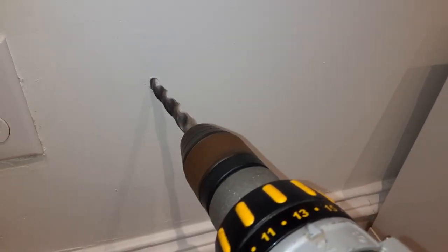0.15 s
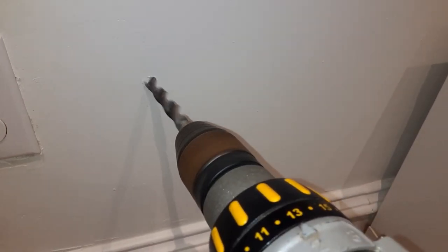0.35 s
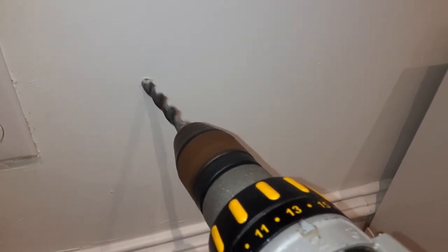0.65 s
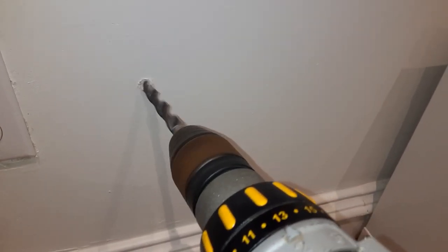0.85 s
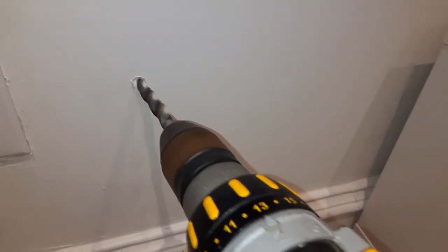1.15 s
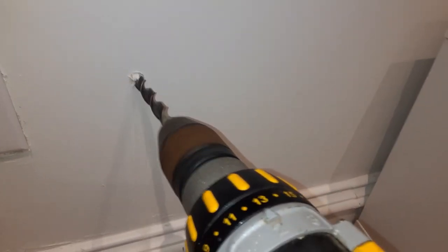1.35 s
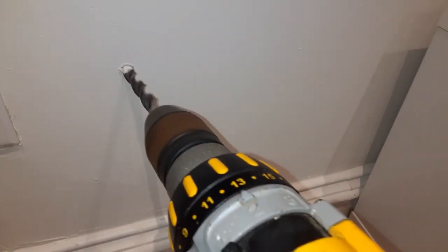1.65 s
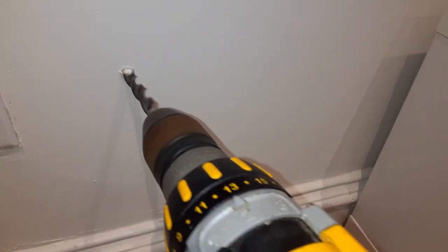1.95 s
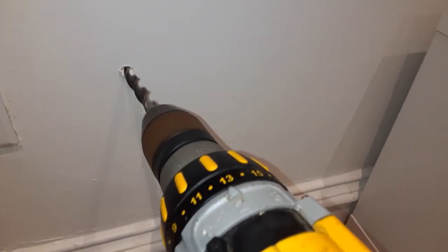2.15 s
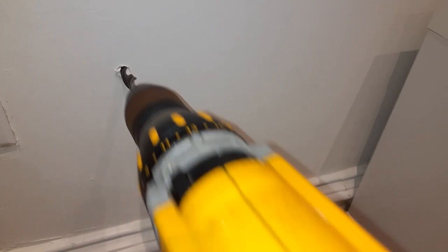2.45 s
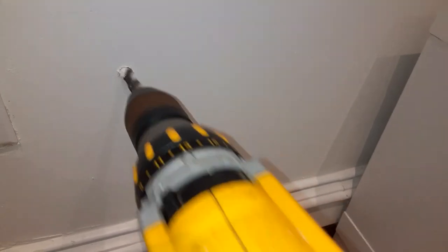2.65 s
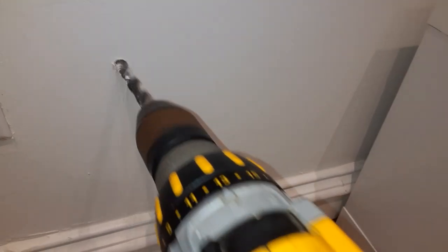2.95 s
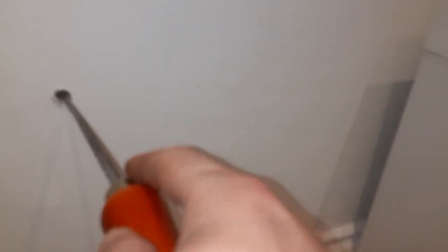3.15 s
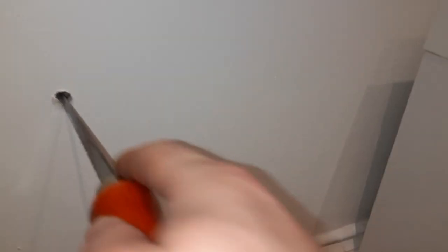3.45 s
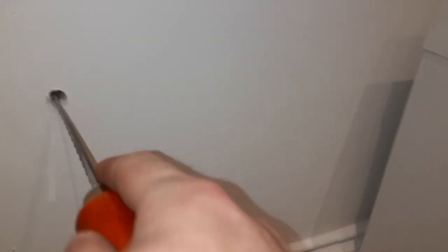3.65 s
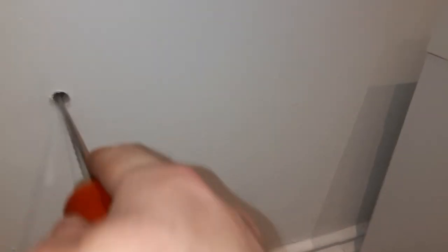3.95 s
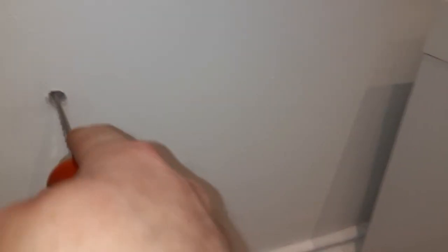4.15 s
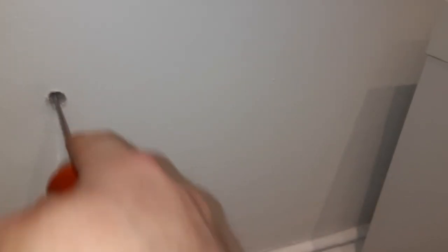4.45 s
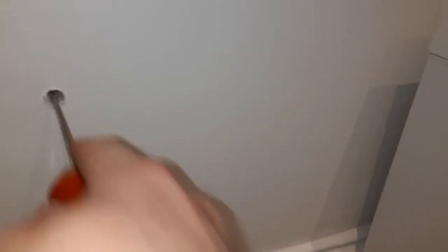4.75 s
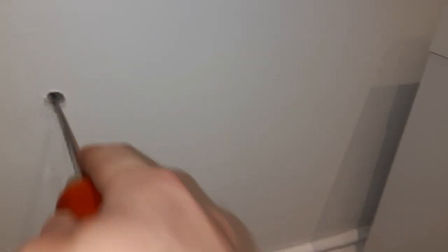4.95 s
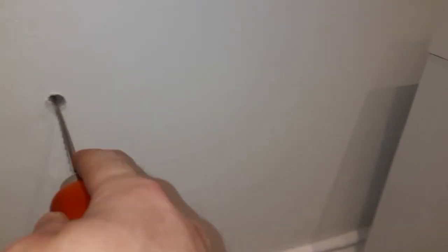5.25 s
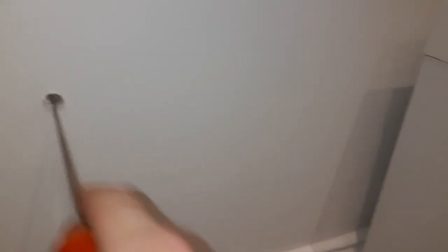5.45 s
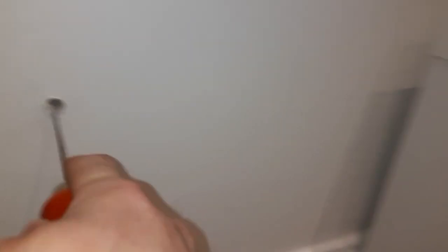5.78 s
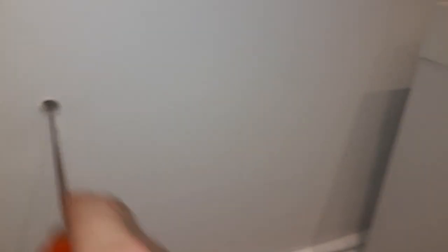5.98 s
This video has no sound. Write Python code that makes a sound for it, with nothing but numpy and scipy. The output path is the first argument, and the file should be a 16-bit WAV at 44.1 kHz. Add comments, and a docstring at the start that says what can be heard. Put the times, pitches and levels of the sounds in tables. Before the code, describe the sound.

Close in a small room, a drill bores into a hollow wall, followed by fast back-and-forth hand sawing.

```python
"""A small room, close to a drywall sheet. A cordless drill spins up and bores through: the motor whines,
gears ring and rattle the housing, brushes hiss, the bit squeaks and its flutes grind gypsum.
The sound cuts off. A jab saw knocks into the hole and is worked to and fro, seven strokes a second:
its teeth drum on the hollow wall, crack the board and scrape out gypsum."""
import sys
import numpy as np
from scipy import signal
from scipy.fft import rfft, irfft
from scipy.io import wavfile

SR = 44100
rng = np.random.default_rng(int(sys.argv[2]) if len(sys.argv) > 2 else 0)


def to_wav(s):
    """Save 16-bit WAV."""
    ch = np.atleast_2d(s).T  # columns
    pcm = np.round(np.clip(ch, -1, 1) * 32767)  # PCM
    wavfile.write(sys.argv[1], SR, pcm.astype(np.int16))


N = 269892
TIME = np.arange(N) / SR
CUT_S, RESUME_S = 3.156, 3.19  # gap between drill and saw


def undb(db):
    """Decibels to gain."""
    return 10 ** (np.asarray(db) / 20)


def unit(x):
    """Scale to rms 1."""
    return x / np.sqrt(np.mean(x ** 2) + 1e-18)


def walk(rate_hz):
    """Smooth random drift, spread near 1."""
    knots = rng.standard_normal(4096)
    return 1.045 * np.interp(TIME * rate_hz, np.arange(len(knots)), knots)


def ramp(centre_s, length_s):
    """Linear step from 0 to 1."""
    return np.clip((TIME - centre_s) / length_s + .5, 0, 1)


def swells(table):
    """Summed gain of bell-shaped swells."""
    return sum(undb(db) * np.exp(-(2 * (TIME - s) / length_s) ** 2) for s, length_s, db in table)


def between(first, second, share):
    """Linear blend, share 0-1."""
    return first + (second - first) * share


def convolve(x, response):
    """Apply an impulse response."""
    return signal.oaconvolve(x, response)[:N]


def body(points=(), modes=(), size=8192):
    """Minimum-phase impulse response of a broad spectrum plus resonances."""
    f = np.arange(size // 2 + 1) * SR / size + 1
    power = np.zeros(len(f)) + 1e-12
    if len(points):
        hz, db = np.transpose(points)
        power += undb(np.interp(np.log(f), np.log(hz), db)) ** 2 / (1 + (hz[0] / f) ** 4)
    for hz, width_hz, db in modes:
        power += undb(db) ** 2 / (1 + ((f - hz * hz / f) / width_hz) ** 2 / 2) ** 2
    cepstrum = irfft(np.log(power) / 2)
    cepstrum[1:size // 2] *= 2
    cepstrum[size // 2 + 1:] = 0
    return irfft(np.exp(rfft(cepstrum)))


def grit(spread_db):
    """Dense tiny impacts of unequal size."""
    return unit(rng.standard_normal(N) * undb(spread_db * rng.standard_normal(N)))


def place(x, lag_ms, pan_db, room_db, t60_s=0.19):
    """Stereo position: left lags by lag_ms and is pan_db louder; each side has its own room echoes."""
    t = TIME[:SR // 4]
    taps = np.arange(-40, 41)
    late = np.convolve(x, np.sinc(taps - lag_ms * SR / 1000), "same")
    out = []
    for direct, db in ((late, pan_db / 2), (x, -pan_db / 2)):
        echoes = rng.standard_normal(len(t)) * np.exp(-np.log(1000) * t / t60_s) * (t > .002)
        out.append(undb(db) * unit(unit(direct) + undb(room_db) * unit(convolve(x, echoes))))
    return np.array(out) * np.std(x)


# room air spectrum: freq_hz, level_db
AIR_SPECTRUM = [(18, -65), (30, -26), (53, -6.5), (129, 1.5), (211, -3), (247, -12), (364, -7.5),
                (437, -14.5), (735, -13.5), (15000, -46.5)]

def room_tone():
    """Soft air, absent for a moment after the drill cuts off."""
    air = unit(convolve(rng.standard_normal(N), body(AIR_SPECTRUM))) * undb(-45.5 + walk(5.43))
    gate = (TIME < CUT_S + .008) | (TIME > RESUME_S)
    return place(air, lag_ms=0, pan_db=-2.5, room_db=-3.5) * gate


# hollow wall resonances: freq_hz, width_hz, level_db
WALL_MODES = [(67.7, 11, 1.5), (81.7, 18.7, 2), (110, 11, -2.5), (150.8, 26.6, -3.5), (262.6, 44, -17.5)]
# drill jolts on the wall: centre_s, length_s, level_db
WALL_JOLTS = [(.64, 0.11, -36.5), (2.39, 0.062, -31.5), (2.82, 0.28, -37), (3.08, 0.036, -43)]

def wall_rumble(speed_oct, given):
    """The drill shakes the hollow wall, more with speed and once the board has given."""
    level_db = between(-50.5, -42, given) + 21 * speed_oct + 5 * walk(10.54)
    shaking = undb(level_db) + swells(WALL_JOLTS)
    return unit(convolve(grit(spread_db=3.5), body(modes=WALL_MODES))) * shaking


# rubbing of the bit: start_s, end_s, pitch_hz, width_hz, level_db
BIT_RUBS = [(-.05, .31, 4840, 70, -30), (2.62, 2.98, 2980, 110, -32), (2.55, 2.9, 4200, 70, -37)]

def bit_rubs(fade_s=0.04):
    """Steel sliding on paint and board rings in narrow, restless bands."""
    out = np.zeros(N)
    for start_s, end_s, hz, width_hz, db in BIT_RUBS:
        ring = unit(convolve(rng.standard_normal(N), body(modes=[(hz, width_hz, db)])))
        gate = np.clip(np.minimum(TIME - start_s, end_s - TIME) / fade_s, 0, 1)
        out += ring * undb(db + 2 * walk(30)) * gate
    return out


# squeaks of the bit: centre_s, length_s, pitch_hz, level_db
BIT_SQUEAKS = [(0.029, 0.029, 4550, -11), (0.102, 0.021, 4490, -12.5), (0.18, 0.011, 4620, -13),
               (0.256, .018, 4450, -10), (0.309, 0.017, 4260, -9), (3.094, 0.017, 4430, -9)]

def bit_squeaks(bend=0.023, roughness=0.024):
    """The bit sticks and slips; each squeak sags in pitch as it grips."""
    out, flutter = np.zeros(N), walk(900)
    for centre_s, length_s, hz, db in BIT_SQUEAKS:
        offset = np.clip((TIME - centre_s) / length_s, -2, 2)
        pitch_hz = hz * (1 + bend * np.abs(offset) + roughness * flutter)
        tone = np.sqrt(2) * np.sin(2 * np.pi * np.cumsum(pitch_hz) / SR)
        out += undb(db) * np.exp(-4 * offset ** 2) * tone
    return place(out, lag_ms=0.086, pan_db=0.5, room_db=-20)


# flute resonances: freq_hz, width_hz, level_db; then the grind level at full depth
FLUTE_MODES, GRIND_DB = [(5040, 210, 1), (5770, 150, 2.5), (9840, 1100, -8)], -27.5

def flute_grind(chatter, depth, plunged):
    """The flutes grind gypsum, louder with depth, silent while plunged through."""
    grains = unit(convolve(grit(spread_db=7.5) * chatter, body(modes=FLUTE_MODES)))
    return grains * undb(GRIND_DB) * depth * (1 - plunged)


# gearbox and housing spectrum: freq_hz, level_db
HOUSING_SPECTRUM = [(250, -22.5), (500, -21.5), (850, -2.5), (1150, -9.5), (1500, -6.5), (1900, -21.5),
                    (3100, -4), (4500, -10), (5700, -6.5), (6700, -12), (9000, -21), (15000, -56)]
# housing resonances: freq_hz, width_hz, level_db
HOUSING_RESONANCES = [(2162, 174, -5.5), (2727, 100, -1), (3830, 660, -2.5), (5075, 400, -4)]
# brush hiss spectrum: freq_hz, level_db
BRUSH_SPECTRUM = [(5500, -9), (6800, -13.5), (7700, 5.5), (8700, -3.5), (9900, -6), (11500, -6),
                  (12900, -5), (13800, -2.5), (15500, -11)]

def rattle_and_brushes(chatter, rattle_db, brush_db):
    """Housing rattle and brush hiss, each two independent noise layers for a smooth, wide sound."""
    housing, brush = body(HOUSING_SPECTRUM, HOUSING_RESONANCES), body(BRUSH_SPECTRUM)
    out = np.zeros((2, N))
    for lag_ms in (.2, .42):
        rattle = unit(convolve(grit(spread_db=5) * chatter, housing))
        hiss = unit(convolve(grit(spread_db=1.5) * chatter, brush))
        out += place(rattle * undb(rattle_db), lag_ms, pan_db=-3.5, room_db=-4.5, t60_s=0.042)
        out += place(hiss * undb(brush_db), lag_ms, pan_db=-1.5, room_db=4.5, t60_s=0.033)
    return out


# motor and gear lines: whine_ratio, relative_db
GEAR_PARTIALS = [(.4, -29), (.625, -36.5), (.8, -20.5), (1.25, -19), (1.4, -41), (1.557, -19.5), (1.8, -26),
                 (2, -26.5), (2.25, -16), (2.34, -23), (2.52, -20), (3, -13), (3.56, -17), (3.94, -14.5),
                 (4, -28), (4.69, -12.5), (4.9, -13), (5, -12), (6, -21), (6.75, -15), (6.94, -16),
                 (9, -16)]

def gear_lines(phase):
    """Tones locked to the motor; play in the gears makes each waver."""
    return sum(np.sqrt(2) * undb(db + 2.6 * walk(16)) * np.sin(ratio * phase + 0.17 * ratio * walk(45))
               for ratio, db in GEAR_PARTIALS)


def gear_mesh(phase, depth):
    """Meshing teeth sing at 4.5 times the whine, fading as the hole deepens."""
    level_db = -26.5 - 13.5 * depth ** 2 + 4 * walk(75)
    return np.sqrt(2) * undb(level_db) * np.sin(4.5 * phase + .55 * walk(150))


def gear_growl(phase, speed_oct, bitten, cutting):
    """Rough gear tone: grows with speed, harder before the bite, softer while cutting."""
    level_db = between(-39.5, -45, cutting) + 10.5 * (1 - bitten) + 10.5 * speed_oct + 3 * walk(60)
    return np.sqrt(2) * undb(level_db) * np.sin(2.06 * phase + .8 * walk(130))


def shaft_hum(shaft_phase, cutting):
    """One cycle a turn, louder while cutting."""
    return np.sqrt(2) * undb(between(-47, -42, cutting) + 3 * walk(22)) * np.sin(shaft_phase)


# housing radiation: whine_hz, level_db
WHINE_RADIATION = [(500, -46), (650, -40), (705, -27.5), (775, -19), (840, -20), (910, -23)]

def motor_whine(phase, whine_hz):
    """Motor tone; the housing radiates it best near full speed."""
    level_db = np.interp(whine_hz, *np.transpose(WHINE_RADIATION))
    return np.sqrt(2) * np.sin(phase) * undb(level_db + .5 * walk(40.27) + .5 * walk(6.26))


def hole_progress(bite_s=0.32, give_s=2.2, plunge_s=2.48, back_s=2.97):
    """Stages, each 0-1: bit has bitten, hole depth, board has given, drill is plunged in."""
    depth = np.clip((TIME - bite_s) / (give_s - bite_s), 0, 1)
    plunged = ramp(plunge_s, 0.33) - ramp(back_s, 0.33)
    return ramp(bite_s, 0.033), depth, ramp(give_s, 0.2), plunged


# motor speed: time_s, whine_hz
MOTOR_SPEED = [(0.0, 513.4), (0.1, 571.2), (0.12, 602.9), (0.16, 625.3), (0.21, 672.0), (0.23, 674.8),
               (0.37, 820.2), (0.4, 856.2), (0.5, 892.9), (0.7, 909.9), (1.2, 860.0), (2.0, 842.1),
               (3.04, 834.9), (3.15, 874.1)]

def drill(full_speed_hz=843):
    """Motor speed and hole progress drive the drill's layers until the sound cuts off."""
    whine_hz = np.interp(TIME, *np.transpose(MOTOR_SPEED))
    speed_oct = np.log2(whine_hz / full_speed_hz)
    bitten, depth, given, plunged = hole_progress()
    cutting = bitten - given
    # slightly duller as the drill moves forward, off the microphone's axis
    rattle_db = -23.5 + 3.5 * speed_oct - 0.8 * plunged
    brush_db = -31 + 7 * speed_oct - 0.5 * plunged
    phase = 2 * np.pi * np.cumsum(whine_hz * (1 + 0.0017 * walk(34.65))) / SR
    shaft_phase = phase / 5
    turn_pulse = 1 + .25 * np.sin(shaft_phase) + .25 * np.sin(2 * shaft_phase)
    whine = motor_whine(phase, whine_hz)
    gears = gear_lines(phase) * undb(rattle_db - 2.5 - 2 * depth)
    gears += gear_mesh(phase, depth) * turn_pulse
    gears += gear_growl(phase, speed_oct, bitten, cutting)
    hum = shaft_hum(shaft_phase, cutting)
    chatter = turn_pulse * undb(.5 * walk(170) + .5 * walk(14))
    rumble = wall_rumble(speed_oct, given)
    grind = flute_grind(chatter, depth, plunged)
    out = place(whine, lag_ms=.1, pan_db=.3, room_db=-26)
    out += rattle_and_brushes(chatter, rattle_db, brush_db)
    out += place(gears + bit_rubs(), lag_ms=0.2, pan_db=-4.5, room_db=-7)
    out += place(grind, lag_ms=0.222, pan_db=7.5, room_db=8, t60_s=0.09)
    out += place(rumble + hum, lag_ms=0, pan_db=-4, room_db=-45)
    cutoff = np.interp(TIME - CUT_S, [-.001, 0, .01], [1, .07, 0])
    return (out + bit_squeaks()) * cutoff


# gypsum on the blade: freq_hz, level_db
GYPSUM_SPECTRUM = [(500, -11.5), (1000, 15.5), (1600, -1.5), (3200, -1), (4800, 4.5), (7500, 0.5),
                   (10300, -6), (12000, -2), (15500, -0.5)]
# blade resonances: freq_hz, width_hz, level_db
BLADE_RESONANCES = [(1540, 230, 10), (2113, 230, 11), (2755, 100, 9.5), (4420, 480, 9.5), (8860, 450, 2),
                    (11900, 340, 0.5), (14000, 510, -14)]
# crunching board: freq_hz, level_db
CRUNCH_SPECTRUM = [(600, 6.5), (1150, -5.5), (1600, -9.5), (2300, -21.5), (3500, -11), (8000, -31)]
# blade knocks in the hole: start_s, tick_relative_db, thud_relative_db
BLADE_KNOCKS = [(3.199, -38, -46), (3.23, -41.5, -30.5), (3.544, -32, -22), (3.573, -35, -18),
                (3.592, -29, -23.5), (3.631, -26, -17), (3.719, -26, -24.5), (3.809, -40, -22),
                (3.869, -25, -15), (4.015, -26, -39), (4.337, -27.5, -49), (5.287, -27, -27),
                (5.391, -32, -36)]

def blade_knocks(tick_decay_s=0.0015, catch_delay_s=.018, catch_db=-39):
    """The blade hits the hole's edge with a crunch and a wall thud; teeth tick as each stroke starts."""
    ticks, thuds = np.zeros((2, N))
    t = TIME[:SR // 20]
    catches = [(s + catch_delay_s, catch_db + 5 * rng.standard_normal()) for s, *_ in SAW_STROKES]
    for start_s, tick_db, *_ in catches + list(BLADE_KNOCKS):
        i = int(start_s * SR)
        tick = undb(tick_db) * rng.standard_normal(len(t)) * np.exp(-t / tick_decay_s)
        ticks[i:i + len(t)] += tick[:N - i]
    for start_s, _, thud_db in BLADE_KNOCKS:
        thuds[int(start_s * SR)] += undb(thud_db)
    wall, board = body(modes=WALL_MODES), body(CRUNCH_SPECTRUM)
    blade = body(GYPSUM_SPECTRUM, BLADE_RESONANCES)
    crunch = convolve(ticks, blade / np.linalg.norm(blade) + undb(0.5) * board / np.linalg.norm(board))
    thud = convolve(thuds, wall / np.abs(wall).max())
    out = place(crunch * undb(4), lag_ms=-0.098, pan_db=1, room_db=-5.5)
    return out + place(thud * undb(2), lag_ms=-.1, pan_db=-4.5, room_db=-6)


def saw_stroke(start_s, end_s, tooth_hz, fastest_share=.53):
    """One pass: blade speed (0-1) and a pulse per catching tooth, uneven in time and force."""
    fastest_s = between(start_s, end_s, fastest_share)
    speed = np.sin(np.pi * np.interp(TIME, [start_s, fastest_s, end_s], [0, .5, 1]))
    teeth, tooth_s = np.zeros(N), start_s
    for jitter, size in rng.standard_normal((64, 2)):
        i = int(tooth_s * SR)
        if tooth_s >= end_s or i >= N:
            break
        teeth[i] = undb(1.9 * size)
        tooth_s += np.exp(.08 * jitter) / (tooth_hz * between(.6, 1.06, speed[i]))
    return np.abs(speed), teeth


# tooth bite through the board: freq_hz, level_db
BOARD_SPECTRUM = [(120, -20), (230, 9.5), (420, 8.5), (700, -5.5), (900, -13.5), (1500, -28), (2200, -62.5),
                  (4000, -50)]
# board resonances: freq_hz, width_hz, level_db
BOARD_RESONANCES = [(275, 18, -5), (378, 30, 10.5), (460, 26, -5), (639, 40, 6.5)]
# blade tip scraping in: centre_s, length_s, level_db
TIP_SCRAPES = [(3.48, .14, -59), (3.575, 0.062, -43), (3.65, .1, -59), (3.735, 0.09, -44.5)]
# push and pull in turn, each until the next: start_s, nominal_tooth_hz, force_db
SAW_STROKES = [(3.78, 98.8, -1), (3.945, 87.6, -6), (4.067, 96.4, .5), (4.212, 113.8, -0.5),
               (4.357, 110.8, -1), (4.504, 117.4, -1), (4.648, 112.5, -2), (4.791, 120.3, -2),
               (4.94, 112.5, 0), (5.092, 111.4, -2.5), (5.224, 117.4, 0), (5.369, 118.6, 2),
               (5.512, 118.7, .5), (5.652, 113.2, 0.5), (5.768, 127.4, 2), (5.9, 114, 0.5),
               (6.028, 111.1, 3.5)]
# a push rasps more, a pull bites more: bite_db, bite_db_per_db, rasp_db, rasp_db_per_db, grab_gain
PUSH, PULL = (-30, 1, -37.5, 0.95, 1.26), (-26, 2.5, -42.5, 0.2, 0.36)

def jab_saw(stop_s=6.17, boom_db=-16, dust_db=-66.5, puff_decay_s=0.0026):
    """Teeth drum on the wall and crack the board, hardest mid stroke; gypsum hisses on both faces."""
    wall, board = body(modes=WALL_MODES), body(BOARD_SPECTRUM, BOARD_RESONANCES)
    blade = body(GYPSUM_SPECTRUM, BLADE_RESONANCES)
    crumbling = undb(3.57 * walk(130))
    hiss = np.array([unit(convolve(grit(spread_db=1) * crumbling, blade)) for _ in range(2)])
    chips = convolve(rng.standard_normal(N), body(CRUNCH_SPECTRUM))
    tip_scrape = swells(TIP_SCRAPES)
    boom = np.zeros(N)
    bite = unit(chips) * crumbling * tip_scrape
    rasp = hiss * (tip_scrape + undb(dust_db)) * (TIME > RESUME_S)
    ends_s = [row[0] for row in SAW_STROKES[1:]] + [stop_s]
    for k, ((start_s, tooth_hz, force_db), end_s) in enumerate(zip(SAW_STROKES, ends_s)):
        bite_db, bite_db_per_db, rasp_db, rasp_db_per_db, grab_gain = PULL if k % 2 else PUSH
        span = slice(int(start_s * SR), int(end_s * SR) + SR // 8)
        speed, teeth = (curve[span] for curve in saw_stroke(start_s, end_s, tooth_hz))
        count = len(speed)
        force = np.tanh(2.14 * speed ** 6)  # levels off with the teeth fully in
        puffs = signal.lfilter([1], [1, -np.exp(-1 / (puff_decay_s * SR))], teeth)
        drum = signal.fftconvolve(teeth * (0.21 + force), wall)[:count]
        crack = signal.fftconvolve(teeth ** 1.4 * (0.13 + force * speed ** 3), board)[:count]
        crunch = chips[span] * puffs * (0.053 + force)
        breaking = unit(crack) + undb(-13) * unit(crunch)
        scrape = hiss[:, span] * (1.3 * speed ** 0.39 + grab_gain * force) * (1 + 1.6 * puffs)
        # levels count over the stroke without its ringing tail
        tail_trim = np.sqrt((min(end_s, N / SR) - start_s) * SR / count)
        boom[span] += unit(drum) * tail_trim * undb(boom_db + force_db)
        bite[span] += breaking * tail_trim * undb(bite_db + bite_db_per_db * force_db)
        rasp[:, span] += unit(scrape) * tail_trim * undb(rasp_db + rasp_db_per_db * force_db)
    out = place(boom, lag_ms=-.1, pan_db=-3.7, room_db=-18)
    out += place(bite, lag_ms=-0.13, pan_db=-2, room_db=-7, t60_s=0.56)
    return out + sum(place(face, lag_ms=-0.089, pan_db=0.5, room_db=1, t60_s=0.034) for face in rasp)


def scene():
    """Drill first, then the saw in the same hole."""
    return drill() + jab_saw() + blade_knocks() + room_tone()


def record(dry):
    """The microphone loses the deepest bass, rounds the peaks and cuts the top."""
    low_hz, top_hz = 38, 15900
    thin = signal.sosfilt(signal.butter(2, low_hz, "highpass", fs=SR, output="sos"), dry)
    rounded = np.tanh(.8 * thin) / .8
    return signal.sosfilt(signal.ellip(10, .2, 80, top_hz, fs=SR, output="sos"), rounded)


dry = scene()
out = record(dry)
to_wav(out)
```